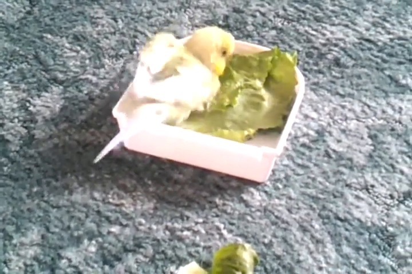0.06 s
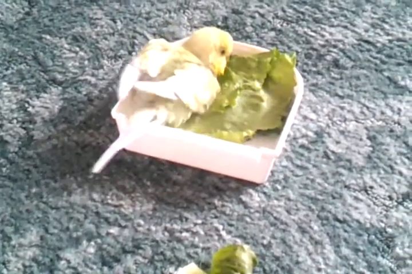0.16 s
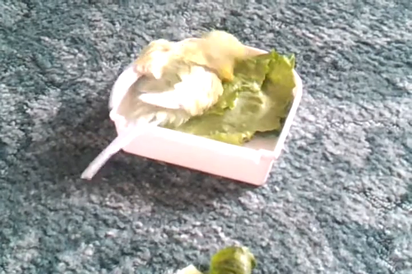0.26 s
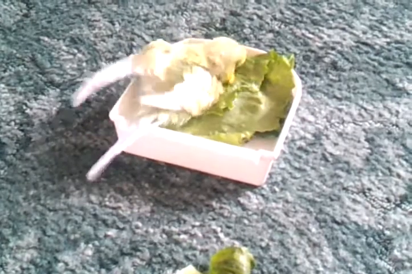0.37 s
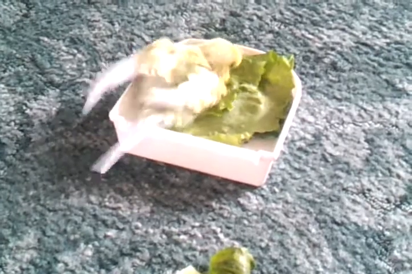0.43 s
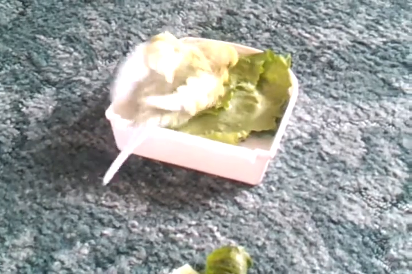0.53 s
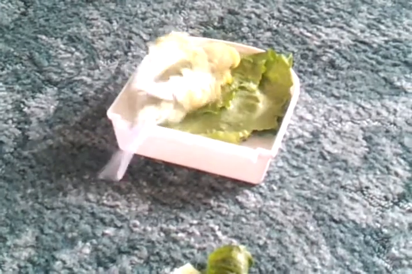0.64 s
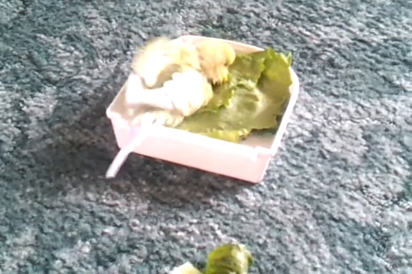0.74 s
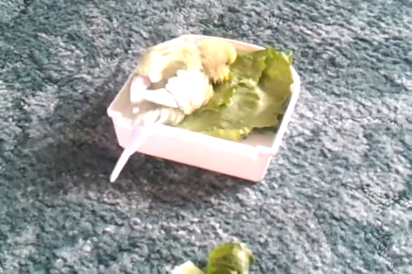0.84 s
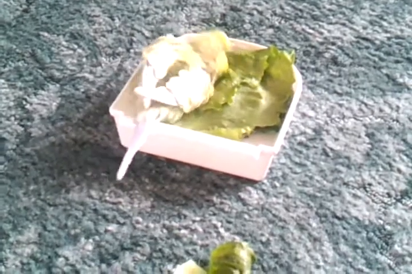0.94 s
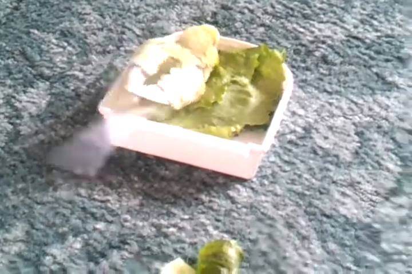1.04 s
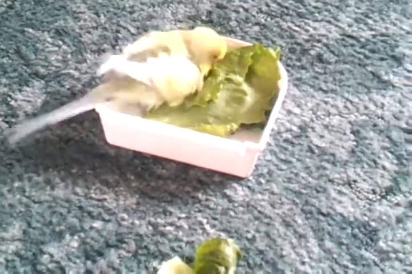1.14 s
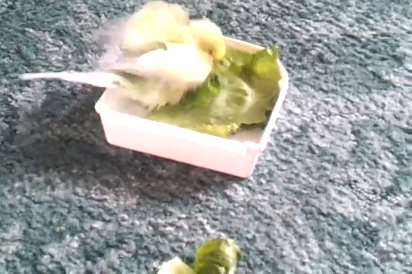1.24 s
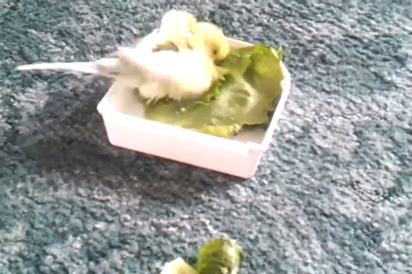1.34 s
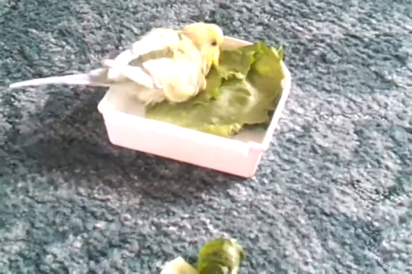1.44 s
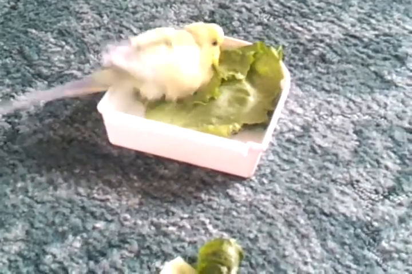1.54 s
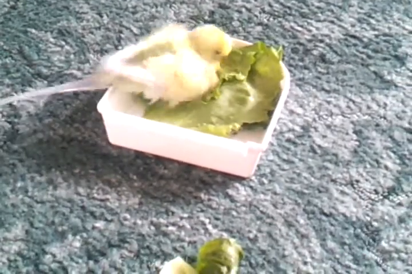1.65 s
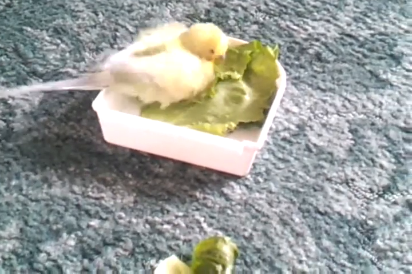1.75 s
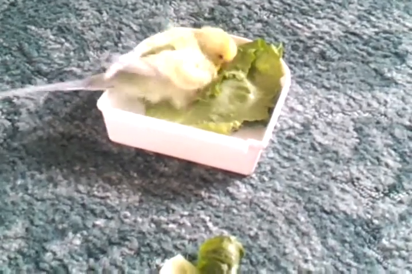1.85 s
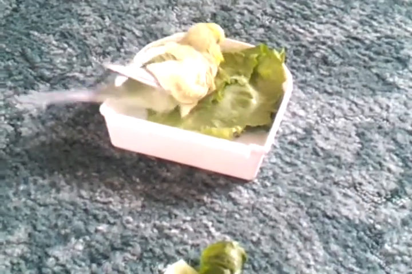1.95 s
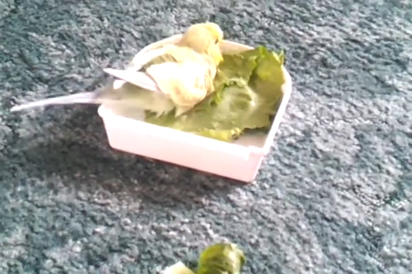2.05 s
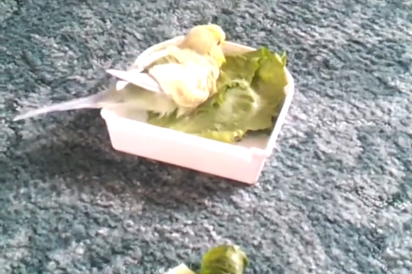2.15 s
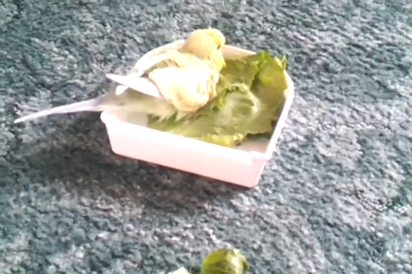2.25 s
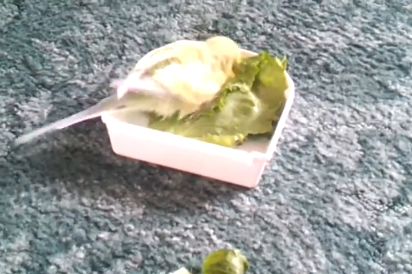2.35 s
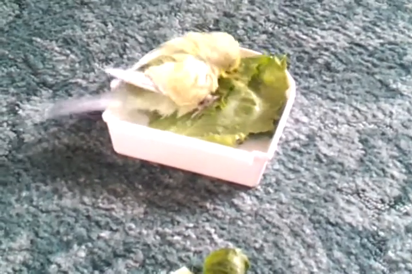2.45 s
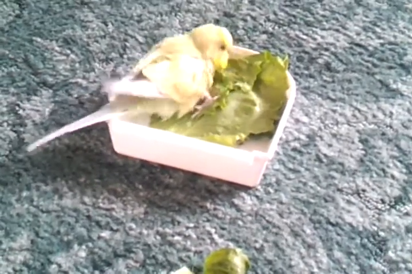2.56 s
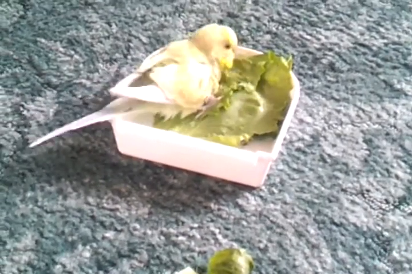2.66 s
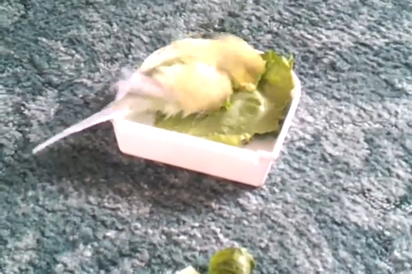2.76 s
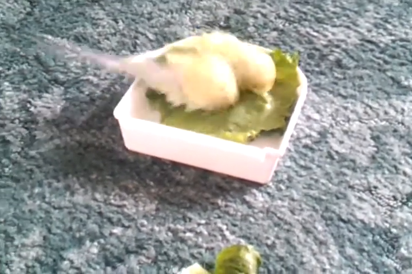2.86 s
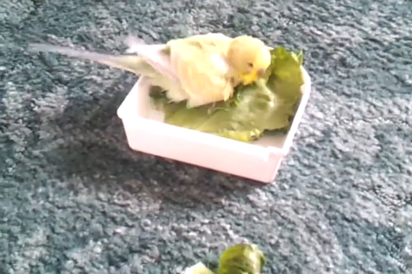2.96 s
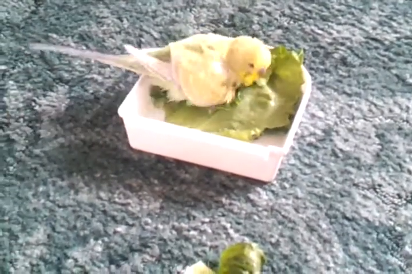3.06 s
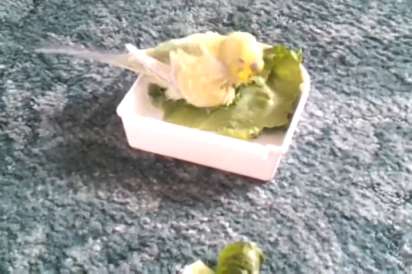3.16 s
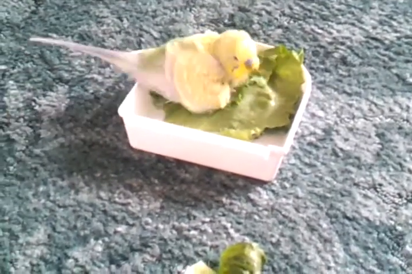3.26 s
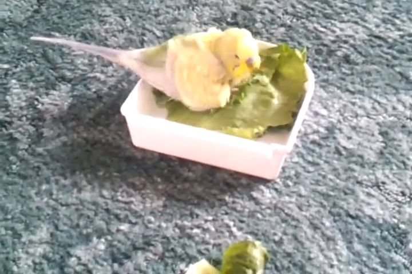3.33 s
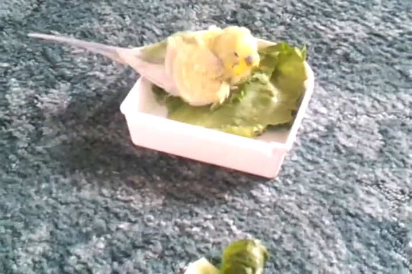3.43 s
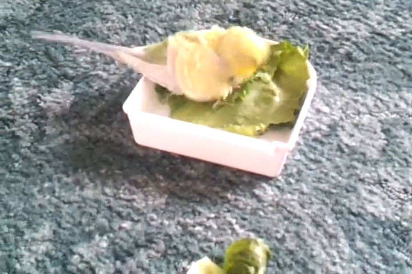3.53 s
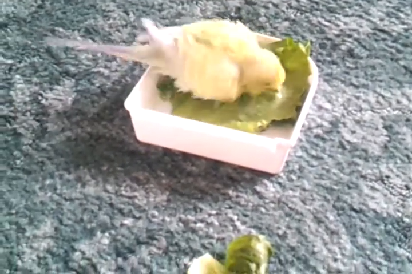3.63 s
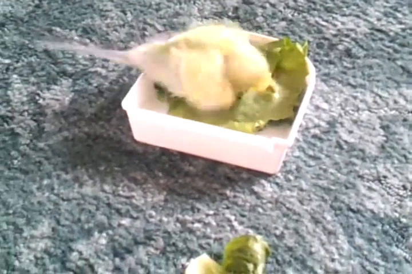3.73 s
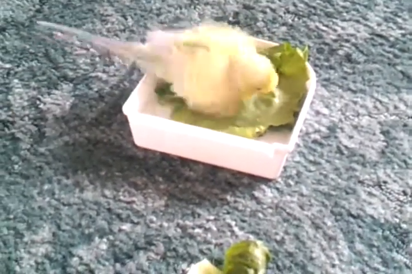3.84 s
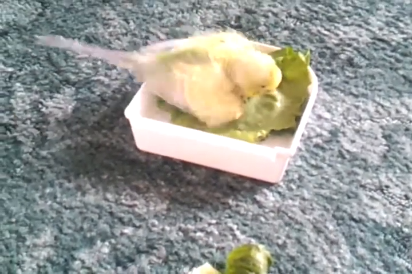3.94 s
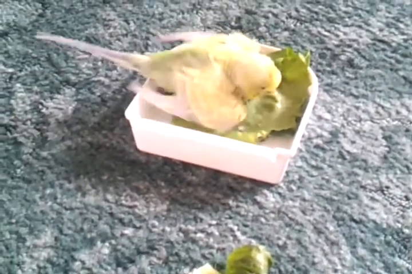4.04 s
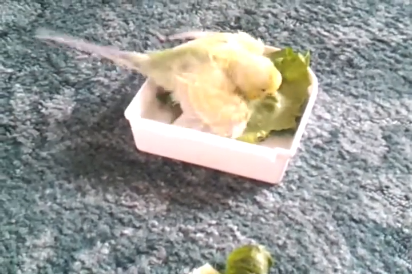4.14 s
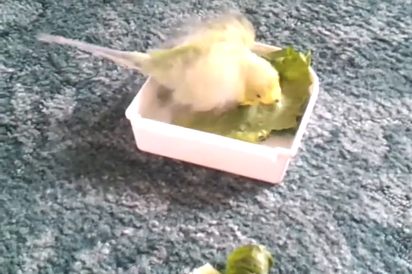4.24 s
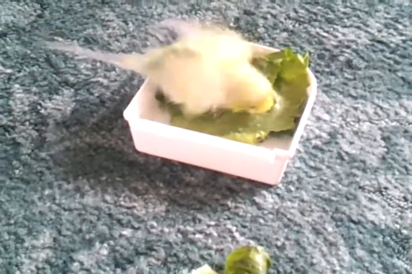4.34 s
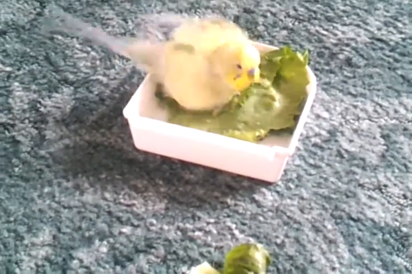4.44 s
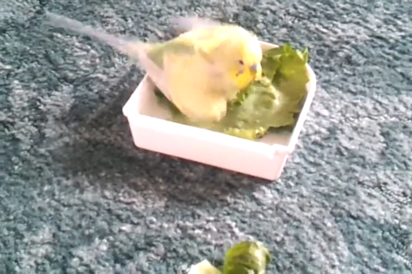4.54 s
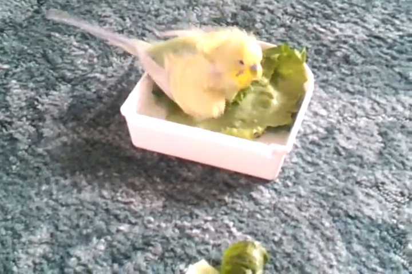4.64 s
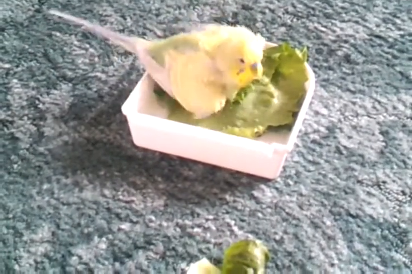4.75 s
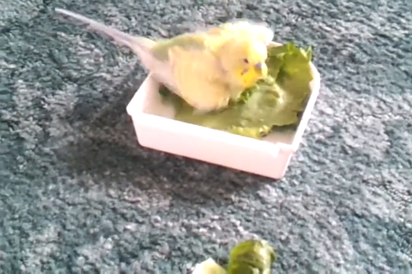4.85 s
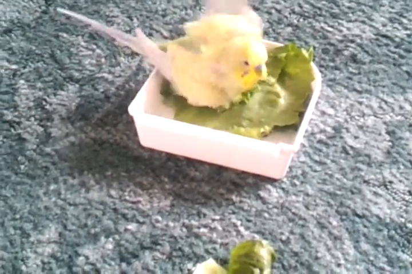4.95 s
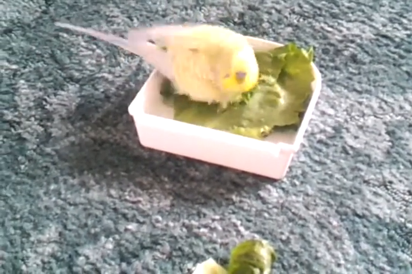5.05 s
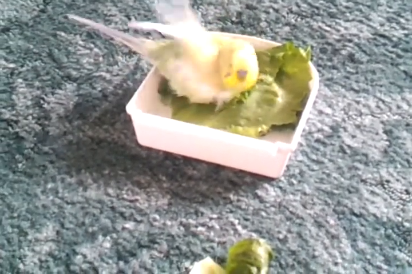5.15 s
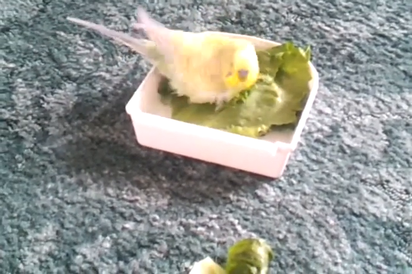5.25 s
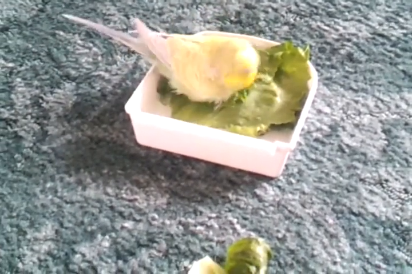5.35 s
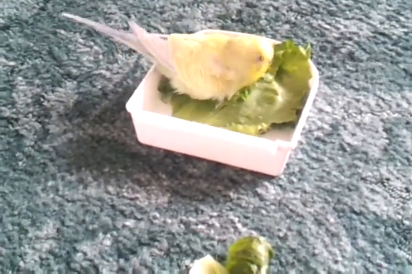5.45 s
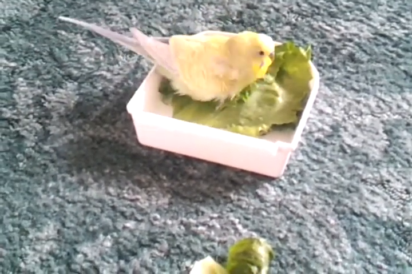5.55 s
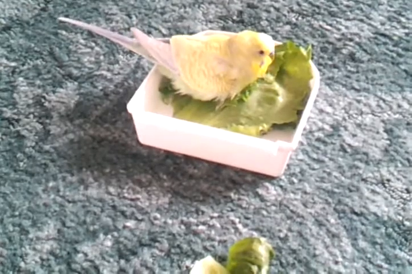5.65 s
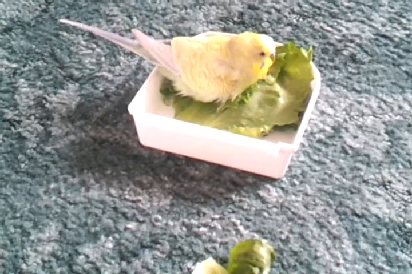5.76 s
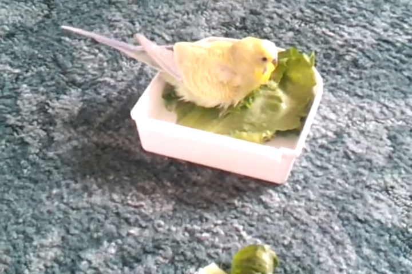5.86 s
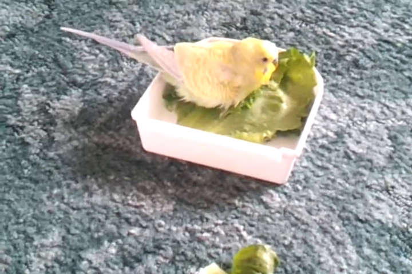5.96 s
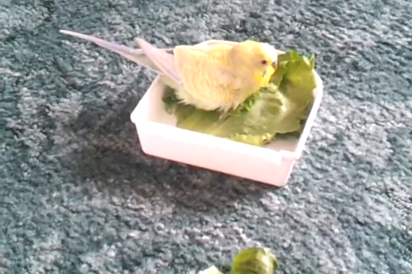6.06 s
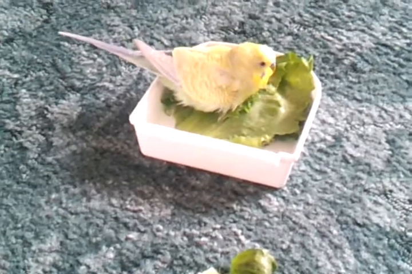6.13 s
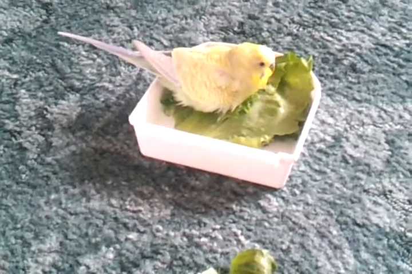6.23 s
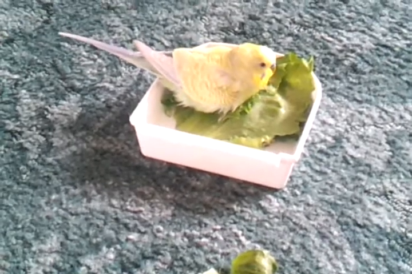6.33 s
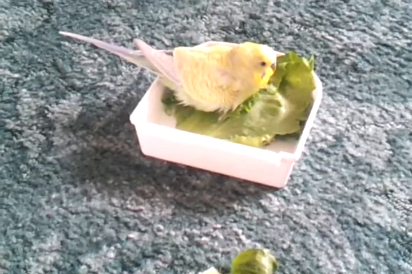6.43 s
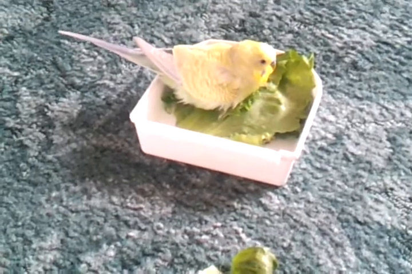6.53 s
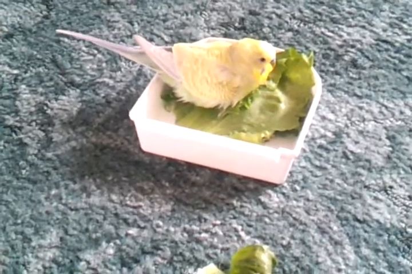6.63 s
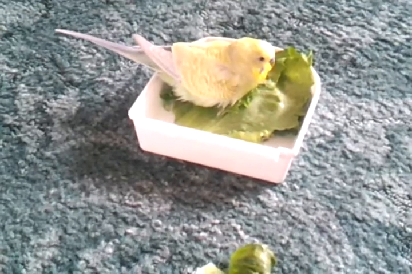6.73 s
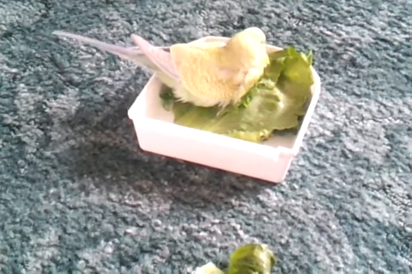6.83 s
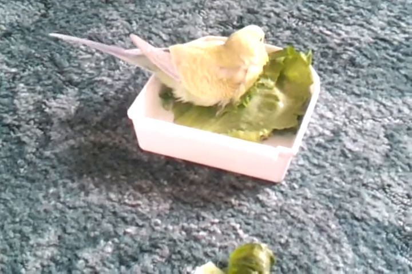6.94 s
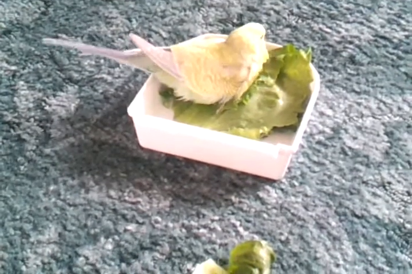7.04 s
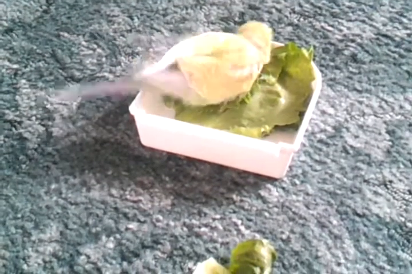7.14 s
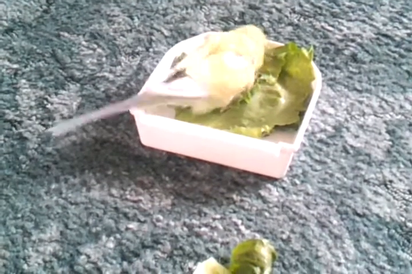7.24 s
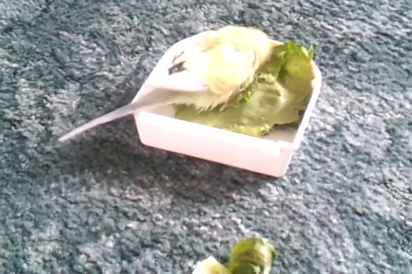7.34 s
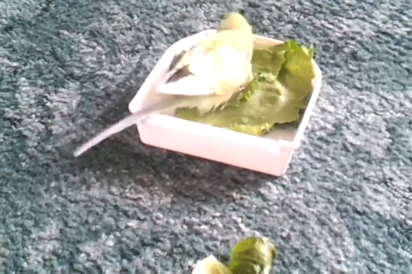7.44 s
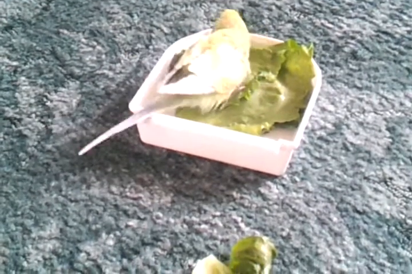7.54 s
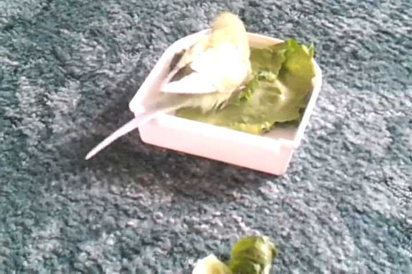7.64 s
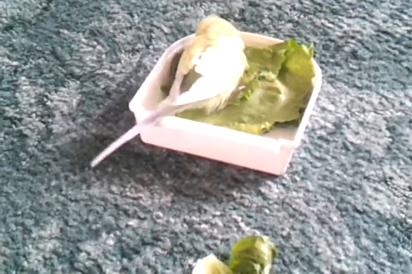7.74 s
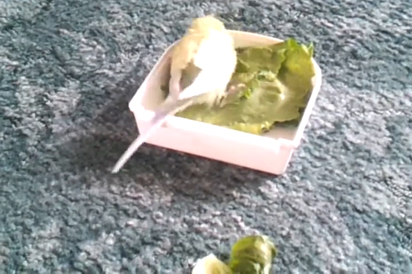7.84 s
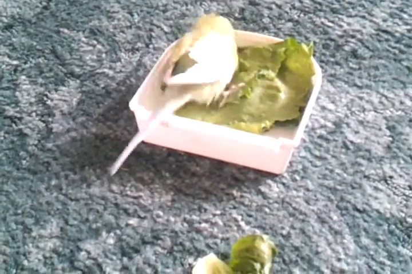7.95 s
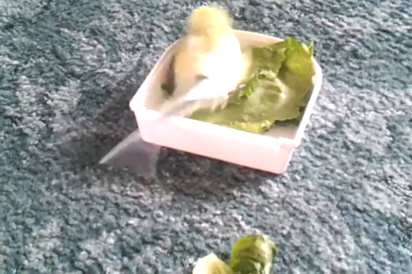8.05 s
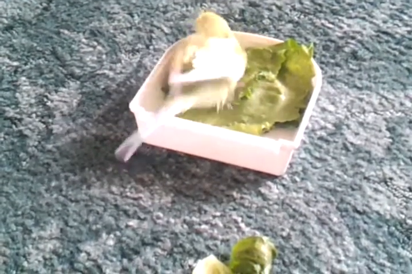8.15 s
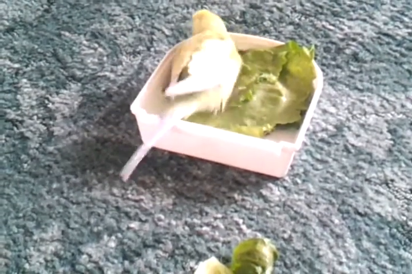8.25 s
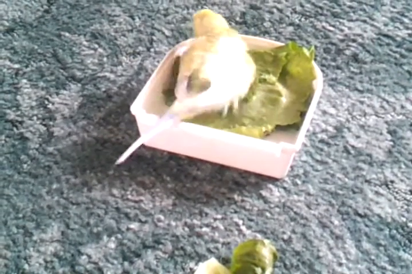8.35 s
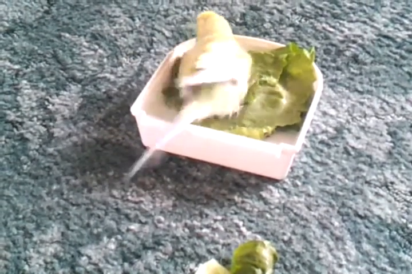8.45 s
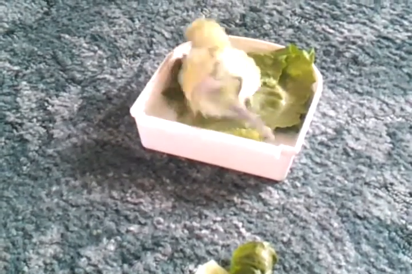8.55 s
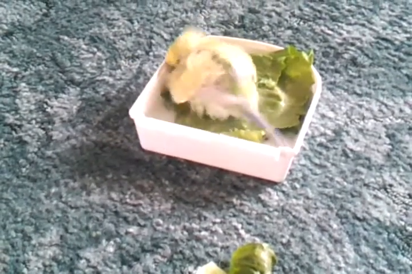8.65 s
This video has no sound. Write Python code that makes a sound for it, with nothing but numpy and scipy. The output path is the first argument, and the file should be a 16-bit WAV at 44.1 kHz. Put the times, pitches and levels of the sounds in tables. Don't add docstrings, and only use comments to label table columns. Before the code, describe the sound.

Close up, a budgie rubs through wet lettuce in a thin plastic tub: dry ticks, brittle snaps and short bright rustles. Another budgie gives a quick chirp across the room early and again near the end. Midway, wing shakes drum softly on the tub with small knocks, then it turns quiet. A small microphone hisses steadily, with a few dull handling thumps.

```python
import sys
import numpy as np
from scipy import signal
from scipy.fft import rfft, irfft
from scipy.io import wavfile

SR = 44100
rng = np.random.default_rng(int(sys.argv[2]) if len(sys.argv) > 2 else 0)


def dump_mix(stems):
    frames = np.atleast_2d(stems).T
    limited = np.clip(frames, -1, 1)
    pcm = np.round(limited * 32767).astype(np.int16)
    wavfile.write(sys.argv[1], SR, pcm)


def ratio_of_db(decibels):
    return 10 ** (np.asarray(decibels, float) / 20)


N = 383229

# start in seconds, length in seconds, bright level in dB, dull level in dB.
STROKES = [(0, 0.21, -63, -68), (0.202, 0.056, -58, -65), (1.126, 0.071, -52.5, -63),
           (1.17, 0.14, -54.5, -69), (1.392, 0.098, -57.5, -64), (1.597, 0.074, -54.5, -60.5),
           (1.803, 0.046, -58.5, -77), (1.851, 0.19, -59.5, -75), (2.436, 0.047, -52.5, -66),
           (2.484, 0.057, -50, -65), (2.545, 0.055, -59.5, -66), (2.78, 0.39, -60.5, -73),
           (3.347, 1.97, -64.5, -73.5), (3.603, 0.11, -63, -73), (3.748, 0.32, -61, -72),
           (3.836, 0.048, -61, -62), (3.982, 0.12, -62, -67), (4.09, 0.074, -57, -64),
           (4.262, 0.15, -67, -70), (4.382, 0.15, -49, -55.5), (4.604, 0.098, -54.5, -59),
           (4.74, 0.18, -56.5, -63), (4.899, 0.073, -49.5, -50.5), (4.967, 0.15, -59.5, -57),
           (5.115, 0.088, -59, -62), (5.908, 0.084, -69, -63), (6.773, 0.089, -63, -73),
           (7.254, 0.28, -64, -71), (8.11, 0.17, -60.5, -64.5), (8.505, 0.076, -57.5, -57.5)]
# frequency in Hz, width in Hz, level in dB.
TUB_MODES = [(1450, 560, 0.5), (1700, 360, 2.5), (2300, 650, -4), (3200, 540, -3)]
# frequency in Hz, width in Hz, level in dB.
LEAF_MODES = [(4500, 1630, -5), (5800, 1220, 0.5), (6580, 1400, -0.5), (7990, 1420, -2)]


def rms_one(x):
    return x / np.sqrt(np.mean(x ** 2) + 1e-20)


def add(out, start, sound):
    i = round(start * SR)
    out[i:i + len(sound)] += sound[:N - i]


def colour(x, points):
    hz = np.fft.rfftfreq(N, 1 / SR) + 1e-3
    point_hz, point_db = np.array(points).T
    gain = ratio_of_db(np.interp(np.log(hz), np.log(point_hz), point_db))
    return irfft(rfft(x) * gain, N)


def smooth_noise(hz):
    r = np.exp(-2 * np.pi * hz / SR)
    return rms_one(signal.lfilter([1], [1, -2 * r, r * r], rng.standard_normal(N)))


def high_pass(x, order, hz):
    return signal.sosfilt(signal.butter(order, hz, "high", fs=SR, output="sos"), x)


def resonate(x, modes):
    out = 0
    for k, (hz, width, db) in enumerate(modes):
        r = np.exp(-np.pi * width / SR)
        b = (1 - r * r) / 2 * np.array([1, 0, -1])
        a = [1, -2 * r * np.cos(2 * np.pi * hz / SR), r * r]
        out = out + (-1) ** k * ratio_of_db(db) * signal.lfilter(b, a, x + 1e-18)
    return out


def ring(hz, t60):
    t = np.arange(4096) / SR
    return np.sin(2 * np.pi * hz * t) * ratio_of_db(-60 * t / max(t60, .001))


def grains(per_s, spread_db):
    sizes = ratio_of_db(spread_db * np.minimum(rng.exponential(1, N), 4)) * rng.choice([-1, 1], N)
    return rms_one(sizes * (rng.random(N) < per_s / SR))


def hiss():
    # frequency in Hz, density in dB per Hz.
    spectrum = [(20, -10.5), (70, -2.5), (200, -4.5), (500, -7), (1130, -11), (1900, -14), (6000, -17.5),
                (8500, -25.5)]
    return ratio_of_db(-57) * rms_one(colour(rng.standard_normal(N), spectrum))


def rustle():
    bright, dull = np.zeros((2, N))
    for start, length, bright_db, dull_db in STROKES:
        u = np.linspace(0, 1, round(length * SR))
        bite = np.clip(u * length / (.003 + 0.13 * length), 0, 1)
        stroke = bite * np.cos(np.pi / 2 * u) ** 0.95
        add(bright, start, ratio_of_db(bright_db) * stroke)
        add(dull, start, ratio_of_db(dull_db) * stroke)
    clumps = ratio_of_db(2.1 * smooth_noise(70))
    leaves = rms_one(resonate(clumps * grains(2700, spread_db=-1.0), LEAF_MODES))
    tub = rms_one(resonate(clumps * grains(1600, spread_db=3.5), TUB_MODES))
    return bright * leaves + dull * tub


def all_snaps():
    # start in seconds, peak in dB, ring in Hz, tub share in dB, crack share in dB.
    quills = [(0.6826, -31, 4500, -5, 5), (0.6916, -27.5, 5220, -19, -2), (0.7106, -33, 4380, -11, -0.5),
              (.736, -35, 4500, -9, -1), (0.763, -36.5, 4280, -16, 1.5), (0.8955, -36, 5220, -23, -9),
              (1.197, -14.5, 4790, -44, -20), (1.6926, -32.5, 4520, -22, -9),
              (2.4187, -37.5, 2740, -12, -1), (2.495, -30.5, 5570, -20, 0), (3.84, -40, 5360, .5, -5),
              (4.0232, -38, 6400, -4, 8.5), (4.0997, -29, 6890, -11, 5.5), (4.4089, -26.5, 5180, -10, 6),
              (4.447, -32, 6370, -8, -1), (4.4628, -32, 5380, -3, -5), (4.5815, -32.5, 4330, -9, 6.5),
              (4.6263, -29.5, 3860, -5, 9.5), (4.701, -33.5, 4360, -2.5, 5), (4.7644, -40.5, 4220, 3, 7),
              (4.8997, -27.5, 4300, -14, -4), (5.1228, -35.5, 3400, -12, 3),
              (8.5014, -29.5, 3740, -18, -0.5), (8.6256, -46, 5370, -10, -1)]
    # start in seconds, peak in dB, ring in Hz.
    ribs = [(.0092, -38, 2780), (.2067, -45, 6200), (.3095, -42.5, 2760), (.4183, -41, 5220),
            (.6405, -36.5, 4600), (.6515, -33, 5150), (.7515, -39, 4330), (.9556, -42.5, 5280),
            (1.159, -38, 4500), (1.1882, -37, 6520), (1.373, -42.5, 6500), (1.4239, -37, 5200),
            (1.428, -36.5, 4690), (1.602, -40, 4700), (1.6134, -35, 2560), (2.9348, -43, 4500),
            (3.4378, -41, 6650), (3.851, -40, 7100), (4.0193, -40, 5300), (4.1149, -39, 6480),
            (4.4274, -33.5, 2690), (4.643, -37, 4600), (4.7392, -40, 6800), (4.912, -33, 4400),
            (5.0434, -39, 3620), (5.5816, -41, 6540), (6.7823, -43, 6600), (7.3125, -42, 6800),
            (3.3691, -42, 5990), (8.125, -45, 4830)]
    after_s, after_db = 0.0045, -15
    stray_db, low_hz, high_hz = 9, 4200, 6950
    tick_tub_db, tick_crack_db = -17, -2.0

    light = list(ribs)
    for start, db, hz, tub_db, crack_db in quills:
        light.append((start + after_s, db + crack_db / 2 + after_db, hz))
    for (start, length, bright_db, dull_db), draws in zip(STROKES, rng.random((len(STROKES), 2, 3))):
        for when, size, pitch in draws:
            hz = low_hz + (high_hz - low_hz) * pitch
            light.append((start + length * when, bright_db + stray_db + 4.0 * size, hz))
    return list(quills) + [(start, db, hz, tick_tub_db, tick_crack_db) for start, db, hz in light]


def snaps():
    ring_t60_s = .011
    rings, cracks, taps = np.zeros((3, N))
    t = np.arange(512) / SR
    burst_decay = ratio_of_db(-60 * t / max(0.63 * ring_t60_s, .001))
    soft_start = np.clip(np.arange(4096) / 18.0, 0, 1)
    for start, db, hz, tub_db, crack_db in all_snaps():
        add(rings, start, ratio_of_db(db - 3.5) * ring(hz, ring_t60_s) * soft_start)
        burst = np.append(5.0, rng.standard_normal(511)) * burst_decay
        add(cracks, start, ratio_of_db(db + crack_db + 3.0) * burst)
        add(taps, start, ratio_of_db(db + tub_db + 7.0) * burst)
    edge = high_pass(cracks, 2, 2200)
    return rings + ratio_of_db(-12.0) * edge + resonate(cracks, LEAF_MODES) + resonate(taps, TUB_MODES)


def calling_bird():
    # seconds after the start, length in seconds, start in Hz, end in Hz, level in dB.
    notes_sung = [(.002, .018, 1333, 1673, -47), (0.015, .007, 3200, 2620, -44),
                  (.026, .015, 2300, 2300, -37.5), (0.029, .036, 3220, 3078, -31),
                  (0.059, 0.009, 3050, 1990, -35), (.064, 0.022, 2400, 2464, -32),
                  (0.077, 0.0082, 2400, 3100, -37.5), (.088, .019, 3230, 3376, -31),
                  (.099, .007, 4000, 3510, -31.5), (.102, 0.0044, 2300, 2400, -26.5),
                  (.107, .0065, 3200, 3200, -16.5), (0.1145, .0055, 3260, 3070, -16.5),
                  (0.123, 0.014, 2590, 2550, -24.5), (.122, .009, 3200, 2800, -47),
                  (.131, 0.009, 3000, 2970, -29), (0.137, .009, 1800, 2043, -39),
                  (.142, 0.0056, 2500, 2300, -29), (.145, .009, 2000, 1025, -45.5),
                  (0.149, 0.022, 955, 872, -41.5), (.157, 0.022, 2530, 2040, -36.5)]
    # start in seconds, loudest note in Hz, closing low note in Hz, stretch in time.
    calls = [
        (0.4729, 3187, 860, 1.03),
        (7.7314, 3239, 927, 1.0),
    ]
    # seconds after the start, level in dB.
    efforts = [
        [(0, -1), (.05, 0.5), (.075, -4), (.095, -5.5), (.11, 2), (.13, -2), (.165, -0.5)],
        [(0, 0.5), (.05, 0), (.075, 4.5), (.095, 3), (.11, 2), (.13, 3), (.165, -0.5)],
    ]
    # pitch in Hz, level in dB.
    octave = [(900, -40), (1500, -44), (1900, -63), (2750, -58), (3100, -43), (3350, -33), (3700, -54)]
    loudest_hz, closing_hz = 3200, 910
    swell, fade = 1.21, 0.91

    out, breath = np.zeros((2, N))
    wobble, rasp = smooth_noise(320), smooth_noise(330)
    for (call_start, call_hz, close_hz, stretch), push in zip(calls, efforts):
        for after, length, start_hz, end_hz, note_db in notes_sung:
            start = call_start + stretch * after
            db = note_db + np.interp(after, *np.transpose(push))
            n, i = round(length * SR), round(start * SR)
            transpose = call_hz / loudest_hz if start_hz > 1200 else close_hz / closing_hz
            hz = transpose * np.linspace(start_hz, end_hz, n) * (1 + .022 * wobble[i:i + n])
            phase = 2 * np.pi * np.cumsum(hz) / SR

            octave_db = np.interp((start_hz + end_hz) / 2, *np.transpose(octave)) - db
            tone = np.sin(phase) + ratio_of_db(min(octave_db, 6.0)) * np.sin(2 * phase)
            clean = min(start_hz, end_hz) > 2790 or start_hz < 1200
            harsh = 1 + (.12 if clean else .45) * rasp[i:i + n]

            u = np.linspace(0, 1, n)
            shape = u ** swell * (1 - u) ** fade
            blow = ratio_of_db(db - 0.57) * shape / shape.max()
            add(out, start, blow * harsh * tone)
            add(breath, start, blow)
    airflow = high_pass(rng.standard_normal(N), 4, 3600)
    return out + ratio_of_db(-17.5) * breath * airflow


def thumps():
    # start in seconds, peak in dB, swing in Hz, t60 in seconds.
    pushes = [
        (2.0905, -30, -300, 0.0095),
        (2.172, -27.5, 151, 0.021),
        (3.361, -28, -135, 0.018),
    ]
    out = np.zeros(N)
    for start, db, hz, t60 in pushes:
        soft_start = np.clip(np.arange(4096) * abs(hz) / SR / 0.39, 0, 1)
        add(out, start, ratio_of_db(db) * ring(hz, t60) * soft_start)
    return out


def knocks():
    # start in seconds, peak in dB, ring in Hz, t60 in seconds, room share in dB.
    hits = [(2.4945, -41.5, 2900, .007, -15), (4.4094, -27.5, 1670, 0.0073, -13),
            (4.7015, -34.5, 2420, 0.0048, -10), (4.0987, -43, 1750, .007, -18),
            (4.446, -34, 895, 0.0083, -6), (3.8375, -40.5, 1500, 0.0073, -10), (4.02, -39, 2600, .005, -20),
            (4.5818, -39, 2700, 0.0037, -17), (4.6262, -31.5, 2420, 0.0032, -19),
            (4.7658, -38.5, 2490, .006, -16), (4.899, -39, 1450, 0.016, 2), (4.899, -33, 1790, 0.011, -6),
            (5.014, -40.5, 1370, 0.01, 2), (5.569, -43, 1650, 0.015, -4), (7.054, -47.5, 1405, 0.028, 0),
            (8.521, -42, 1765, 0.034, -13)]
    direct, sent = np.zeros((2, N))
    for start, db, hz, t60, room_db in hits:
        add(direct, start, ratio_of_db(db) * ring(hz, t60))
        add(sent, start, ratio_of_db(db + room_db) * ring(hz, t60))
    return direct, sent


def drumming():
    # start in seconds, length in seconds, level in dB.
    bursts = [
        (4.38, 0.096, -58.5),
        (4.774, .1, -54),
        (4.93, 0.136, -59),
        (5.17, 0.15, -66),
    ]
    # frequency in Hz, width in Hz, level in dB.
    floor_modes = [(277, 65, -2), (173, 23, -2.5)]
    attack_s, release_s = .02, 0.025
    t = np.arange(N) / SR
    shaken = np.zeros(N)
    for start, length, db in bursts:
        rise = (t - start) / attack_s
        fall = 1 + (start + length - t) / release_s
        shaken += ratio_of_db(db) * np.clip(np.minimum(rise, fall), 0, 1)
    hum_hz = floor_modes[0][0] * (1 + 0.0294 * smooth_noise(12))
    hum = np.sin(2 * np.pi * np.cumsum(hum_hz) / SR)
    rumble = rms_one(resonate(rng.standard_normal(N), floor_modes))
    return shaken * rms_one(hum + 1.35 * rumble)


def room(x):
    # band centre in Hz, t60 in seconds.
    decay = [(500, 0.39), (2500, 0.29), (7000, 0.34)]
    edges = [150, 1200, 4500, 9000]
    t, tail = np.arange(SR // 2) / SR, 0
    for low, high, (hz, t60) in zip(edges, edges[1:], decay):
        band_pass = signal.butter(2, [low, high], "band", fs=SR, output="sos")
        band = signal.sosfilt(band_pass, rng.standard_normal(len(t)))
        tail = tail + band * ratio_of_db(-60 * t / t60)
    tail = tail * np.clip(t / 0.003 - .5, 0, 1)
    return signal.fftconvolve(x, tail / np.sqrt(np.sum(tail ** 2)))[:N]


def scene():
    # frequency in Hz, gain in dB.
    capsule = [(6000, 0.5), (7000, -0.5), (7500, -8), (8000, -21), (8500, -20), (8900, -26), (9150, -62.5),
               (9600, -95)]
    wall_echo_s, wall_echo_db = .017, -14
    near_room_db, bird_room_db = -20, -6
    near, bird = snaps(), calling_bird()
    struck, sent = knocks()
    echo = ratio_of_db(wall_echo_db) * np.roll(near, round(wall_echo_s * SR))
    tail = room(ratio_of_db(near_room_db) * near + sent + ratio_of_db(bird_room_db) * bird)
    air = near + echo + struck + rustle() + drumming() + bird + tail
    return colour(air + thumps() + hiss(), capsule)[None]


def low_pass(x):
    return signal.sosfilt(signal.butter(12, 9030, fs=SR, output="sos"), x)


def record(dry):
    return low_pass(dry)


dry = scene()
out = record(dry)
dump_mix(out)
```